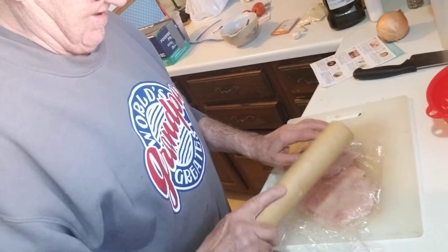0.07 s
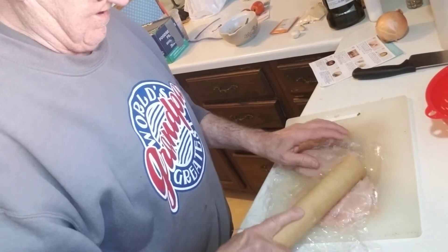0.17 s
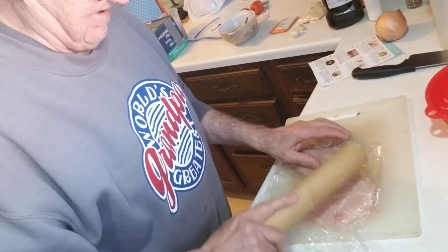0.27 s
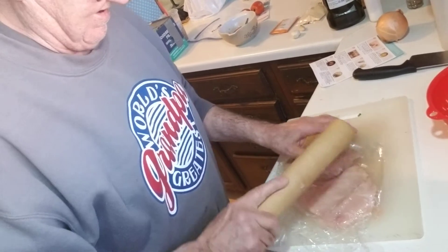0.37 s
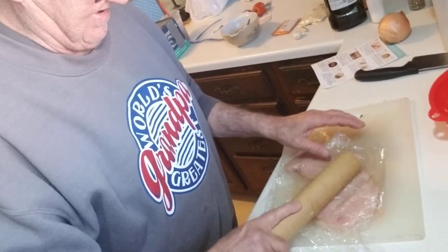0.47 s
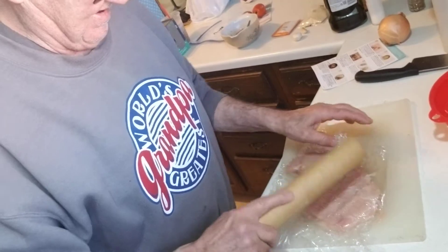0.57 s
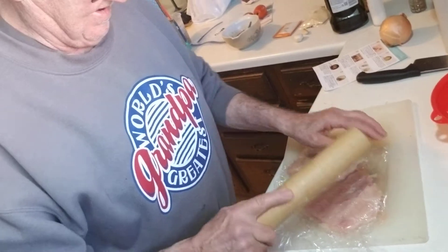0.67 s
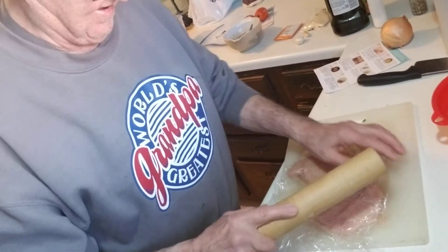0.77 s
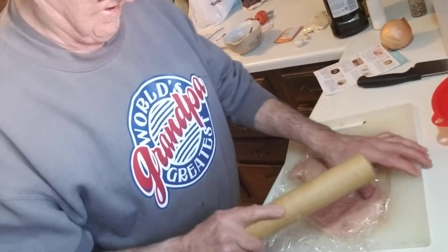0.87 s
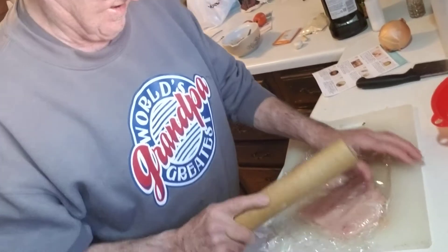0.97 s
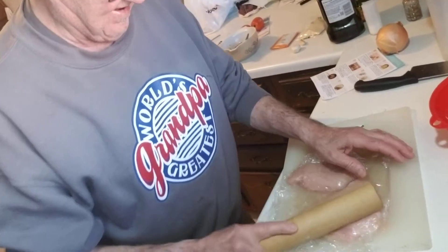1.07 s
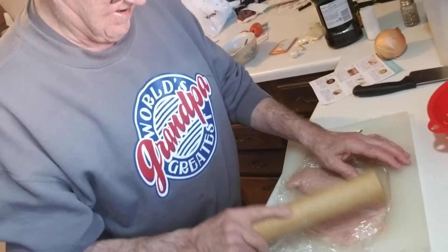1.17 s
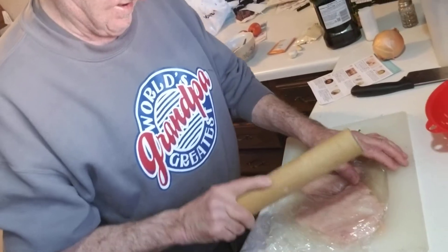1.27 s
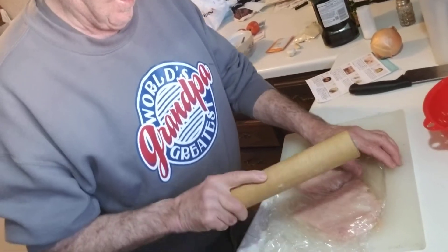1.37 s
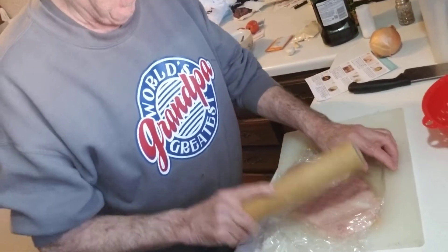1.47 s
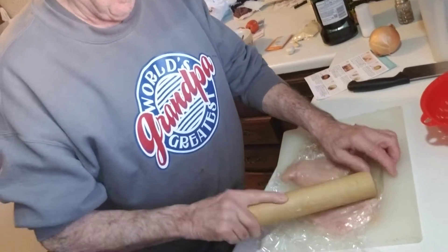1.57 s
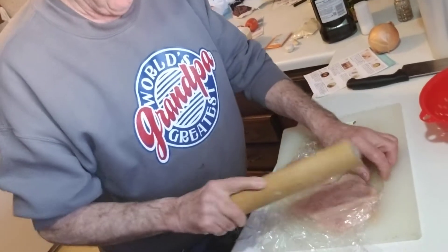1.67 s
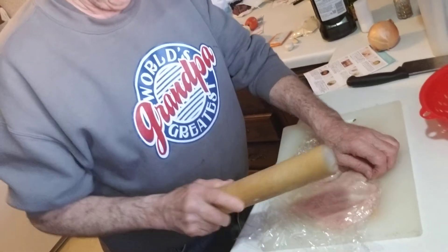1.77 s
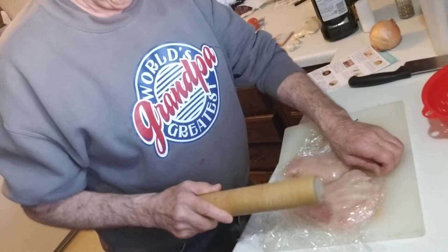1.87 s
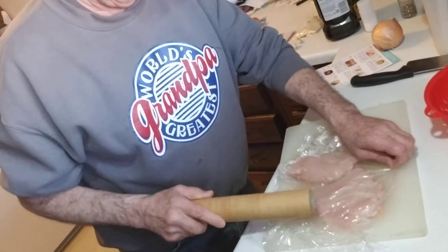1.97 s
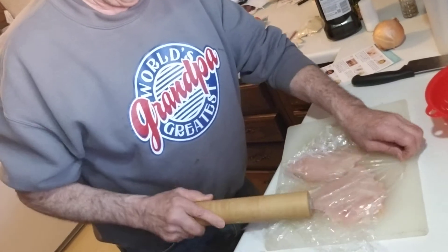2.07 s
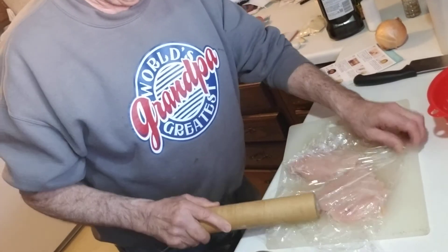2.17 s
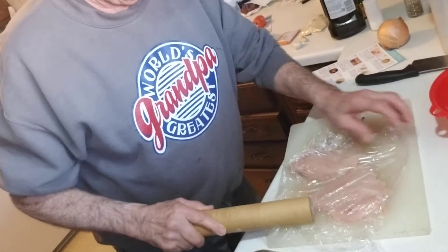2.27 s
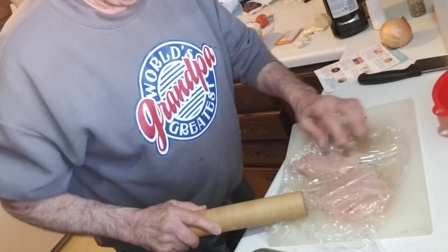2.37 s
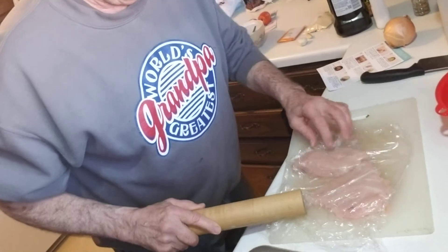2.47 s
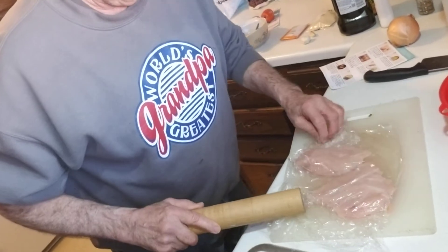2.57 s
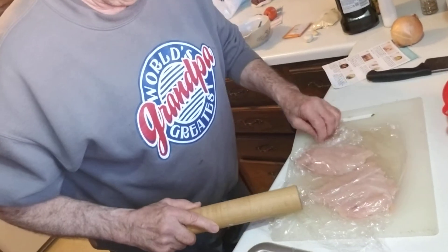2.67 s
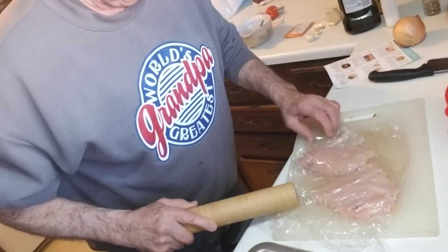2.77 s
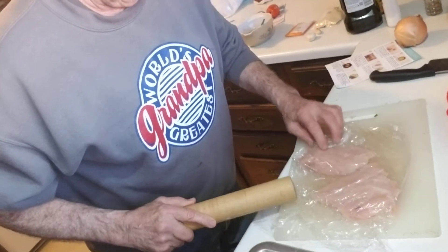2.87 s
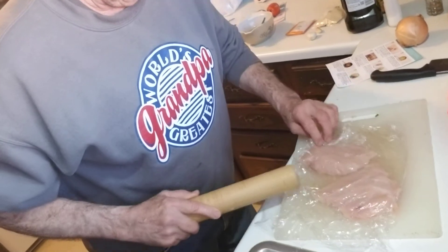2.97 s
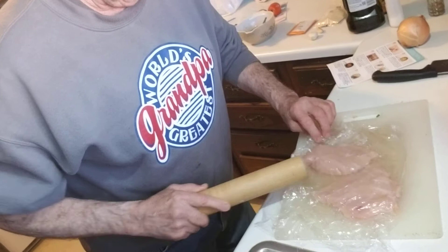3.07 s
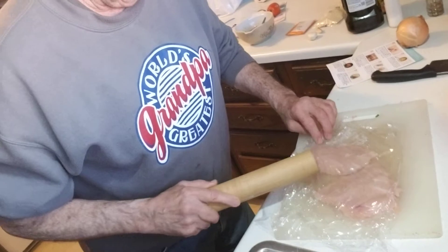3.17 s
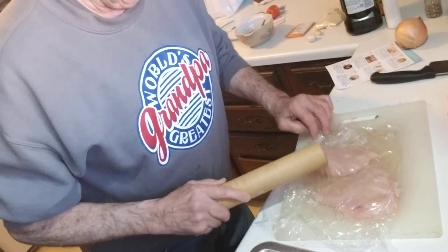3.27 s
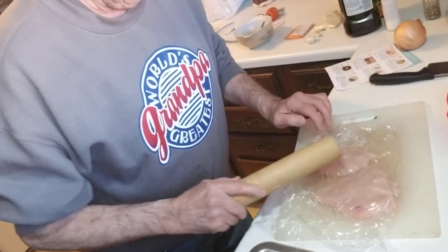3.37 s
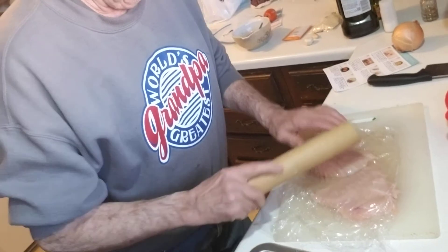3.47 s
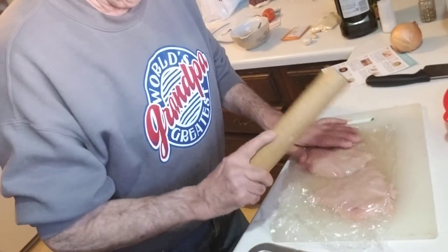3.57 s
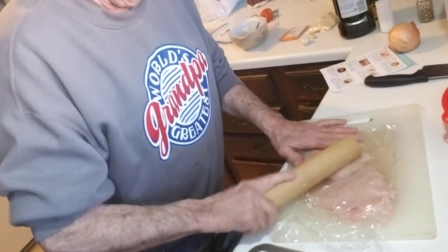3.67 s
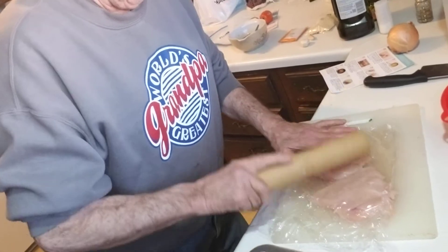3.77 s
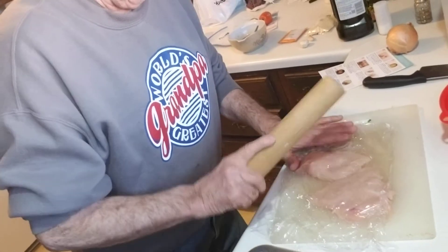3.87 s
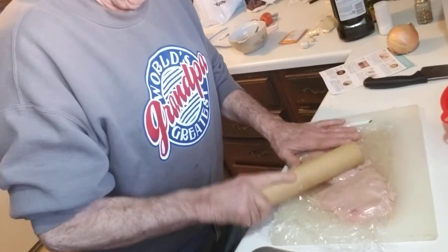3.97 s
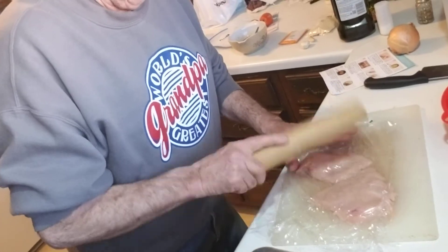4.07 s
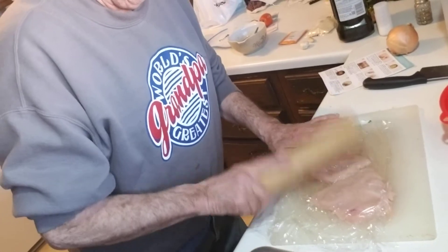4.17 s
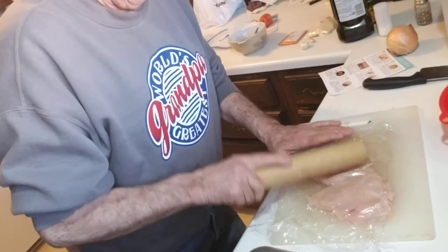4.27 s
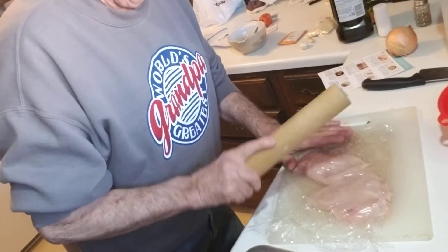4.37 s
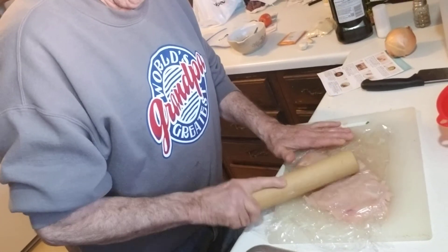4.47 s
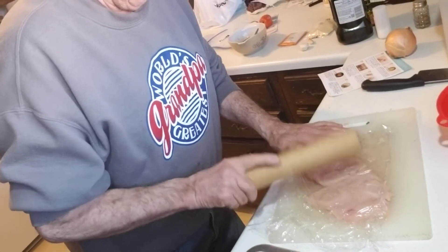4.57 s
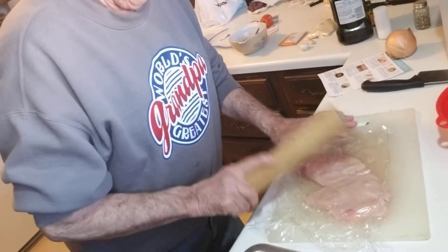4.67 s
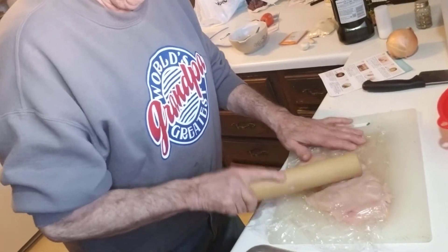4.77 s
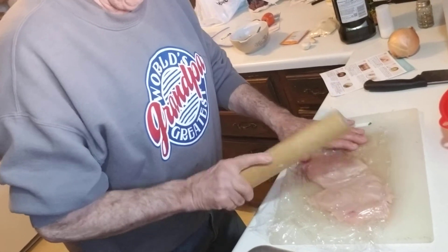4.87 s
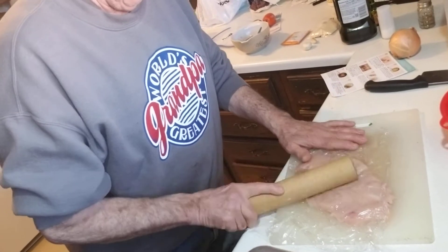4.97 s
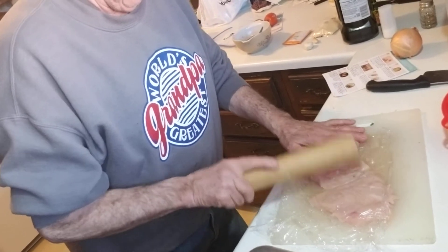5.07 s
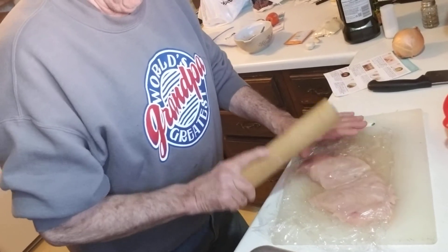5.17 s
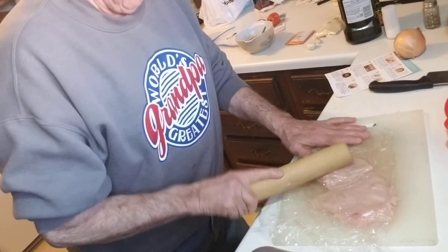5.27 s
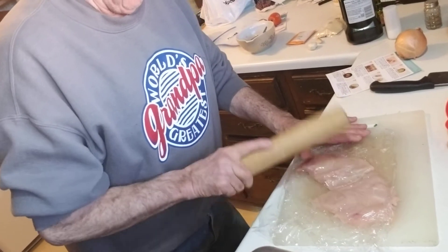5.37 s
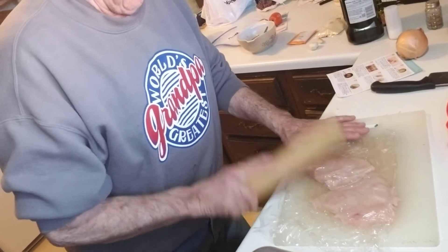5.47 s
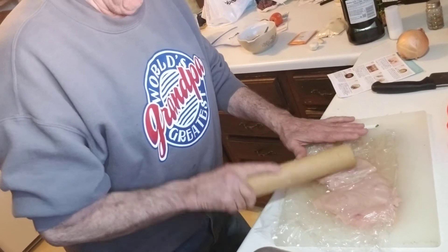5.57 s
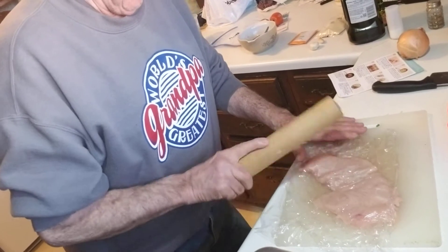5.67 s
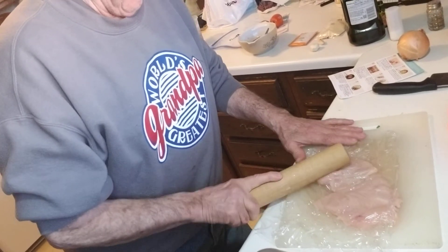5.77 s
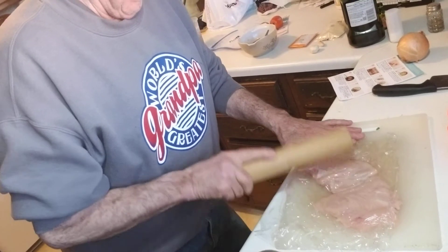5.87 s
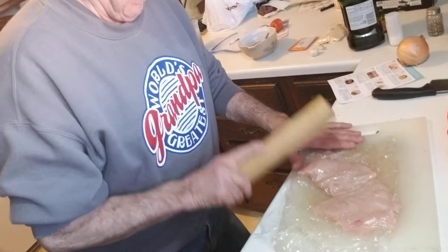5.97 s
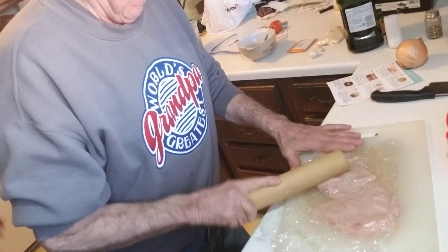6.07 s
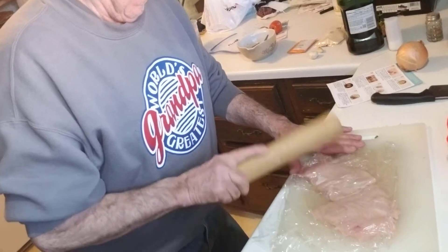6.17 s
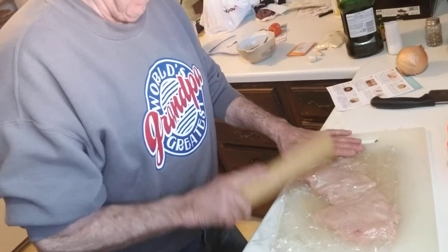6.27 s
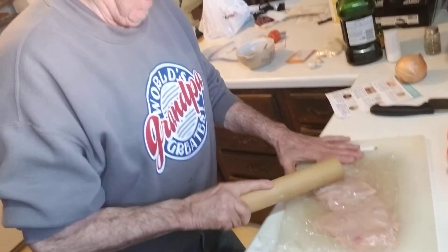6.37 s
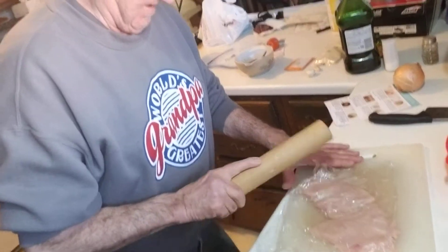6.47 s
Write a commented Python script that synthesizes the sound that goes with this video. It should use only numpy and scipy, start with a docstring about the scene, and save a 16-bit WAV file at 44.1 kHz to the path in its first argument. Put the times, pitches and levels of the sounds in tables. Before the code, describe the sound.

Heavy, cushioned thuds on meat and board, heard by close stereo microphones in a small, quiet kitchen. Each has a crisp plastic snap, a brief wet splat, a hollow counter boom and a small loose rattle. Four uneven blows come first, then film is tugged and crackles over soft rumbling and rubbing. After a near-still moment, pounding resumes regularly, about four per second, growing boomier and flatter toward the end.

```python
"""A kitchen, two microphones close to the counter: a rolling pin pounds chicken under plastic wrap on a board.
Each blow cracks the wrap and splats the meat (showers of tiny clicks) and booms through the counter (ringing modes).
The board rattles after each blow, sooner after a flat one; the wrap peels off the pin on its way up.
Between blows a hand tugs the film into crackle and swish and rubs the board, over soft rumble and room hush."""
import sys
import numpy as np
from scipy import signal
from scipy.fft import rfft, irfft
from scipy.io import wavfile

SR = 44100
rng = np.random.default_rng(int(sys.argv[2]) if len(sys.argv) > 2 else 0)


def wav_record(signal):
    """Record a signal, one row per channel, as 16-bit PCM in the file named by sys.argv[1]."""
    frames = np.transpose(np.atleast_2d(signal))
    bounded = np.clip(frames, -1, 1)
    # unit amplitude maps onto the largest positive 16-bit level
    quanta = np.round(bounded * 32767).astype(np.int16)
    wavfile.write(sys.argv[1], SR, quanta)


N = 287532
TIME = np.arange(N) / SR

# Levels in the tables are source levels, ahead of the balance of direct and room sound.
# The room's quiet background: (frequency [Hz], relative level [dB])
HUSH_SPECTRUM = [(25, -17), (55, -1.5), (115, -3.5), (150, -18), (300, -23.5), (600, -26), (1400, -29.5),
                 (4000, -36.5), (8000, -40), (13000, -30.5), (16000, -35.5)]
# Reverberation of the kitchen: (frequency [Hz], decay by 60 dB [s])
KITCHEN_T60 = [(100, 1), (300, 0.27), (700, 0.31), (1800, .32), (4800, 0.26), (8000, 0.26), (13000, 0.15)]
# Likeness of the sound at the two microphones: (frequency [Hz], correlation [-1 to 1])
LIKENESS = [(100, 0.97), (290, 0.88), (640, 0.31), (1400, -0.18), (3100, 0.013), (7000, -0.039)]
# Body leaning on the counter: (frequency [Hz], relative level [dB])
RUMBLE_SPECTRUM = [(25, -17.5), (42, -13), (54, -3), (72, -3), (95, -5), (115, -9), (145, -20.5),
                   (400, -66)]
# Hand rubbing over the board: (frequency [Hz], relative level [dB])
RUBBING_SPECTRUM = [(100, -17.5), (155, 8.5), (210, -11), (300, -8), (400, -10), (500, -18.5), (900, -21.5),
                    (3000, -62)]
# Rubs of the hand: (time of hardest press [s], swell [s], release [s], level [dB])
RUBS = [(2.125, 0.068, 0.15, -40.5), (2.35, 0.21, 0.09, -48.5), (2.76, 0.29, .1, -55)]
# Tugs at the wrap: (time at the tautest [s], swell [s], release [s], crinkle [dB], swish against crinkle [dB])
TUGS = [ (.01, 0.066, 0.062, -60, -8), (.165, 0.087, .05, -55, -18), (.91, 0.084, 0.055, -58.5, -27),
        (2.02, 0.49, 0.26, -46.5, -8.5), (2.17, 0.09, 0.14, -46, -10.5), (2.32, 0.098, 0.062, -51, -8),
        (2.539, 0.19, 0.25, -43.5, -8), (2.933, 0.14, 0.11, -45, -6.5), (3.201, 0.66, 0.11, -51.5, -8),
        (3.528, 0.024, 0.27, -45, -4.5)]
# Lone snaps of the wrap: (time [s], level [dB])
SNAPS = [(0.108, -49), (1.058, -50.5), (1.396, -53), (1.844, -33.5), (2.171, -37), (3.524, -44)]
# Crinkling film: (frequency [Hz], relative level [dB])
CRINKLE_SPECTRUM = [(1000, -16.5), (4000, -10.5), (7000, -17.5), (10000, -9), (13000, -2.5), (15500, -3)]
# Softer swish of the film: (frequency [Hz], relative level [dB])
SWISH_SPECTRUM = [(400, -31), (900, -8), (1500, -5.5), (2400, 1), (3300, -2), (4600, 0.5), (7000, -16),
                  (15000, -16)]
# Rattling board: (frequency [Hz], relative level [dB])
BOARD_SPECTRUM = [(90, -12.5), (200, -6), (400, 1), (520, -3.5), (660, 1.5), (830, -7.5), (1000, -9),
                  (2300, -15.5), (3400, -20), (5300, -19), (7000, -29.5), (10000, -24), (13000, -19.5),
                  (16000, -25.5)]
# A utensil set ringing by the board's clatter: (frequency [Hz], level [dB], decay by 60 dB [s])
UTENSIL_MODES = [(1470, -74, .8), (1410, -70, .8)]
# Crack of the wrap under the pin: (frequency [Hz], relative level [dB])
CRACK_SPECTRUM = [(500, -22), (2000, -10), (4800, -15.5), (7000, -20.5), (10000, -12.5), (13000, -1),
                  (15500, -9)]
# Wet splat of the meat: (frequency [Hz], relative level [dB])
SPLAT_SPECTRUM = [(120, -16), (300, 12), (520, 4), (700, 6.5), (1000, 1.5), (2100, 0.5), (3300, -6),
                  (4900, -4.5), (7000, -15), (10000, -9), (13000, -12.5), (16000, 1.5)]
# Counter and the cabinet below it: (frequency [Hz], level [dB], decay by 60 dB [s])
COUNTER_MODES = [(45.6, -34.5, 0.72), (58.77, -17.5, 0.34), (92.1, -12, 0.18), (129.35, -26.5, 0.52),
                 (145.7, -19.5, 0.41), (156.7, -9.5, .24), (175.4, -17, 0.35), (202.4, -17.5, 0.34),
                 (237.5, -19, 0.32), (266, -11, 0.089), (296.7, -15.5, 0.28), (315, -26.5, 0.51),
                 (323.3, -18.5, 0.19), (404.4, -21.5, 0.31), (453, -32, 0.49)]
# Things on the counter that ring on: (frequency [Hz], level [dB], decay by 60 dB [s])
SYMPATHY_MODES = [(204.6, -45.5, 1.4), (370, -44.5, 0.99)]
# The pin rested on the edge of the board: (time [s], force [dB], time to peak force [ms], board knock [dB])
SET_DOWN = (2.056, -26.5, 0.45, -38)
# Blows of the pin: (time [s], force [dB], time to peak force [ms], wrap crack [dB], wet splat [dB],
# peeling [dB], board knock [dB], flatness [0 to 1])
BLOWS = [ (.173, 2, 1.17, -14, -22, -72, -31, 0.08), (.455, 0.5, 0.98, -19.5, -27.5, -70, -35.5, 0),
         (1.081, 0, 0.69, -15, -28, -78, -31, 0.15), (1.518, 1.2, 0.92, -20.5, -27, -57.5, -32.5, 0),
         (3.679, 3, 1.15, -11, -20, -46.5, -21.5, 0.03), (3.951, 2, 0.82, -16.5, -14.5, -64, -23, 0.05),
         (4.197, -1.2, 0.33, -8.5, -13.5, -58, -27.5, 0.05), (4.45, -1, 0.85, -20, -21.5, -60.5, -26.5, 0),
         (4.715, 0.5, 0.32, -17.5, -19, -69, -25, 0.01), (4.958, -1, 1.03, -19.5, -24, -61.5, -30.5, 0.02),
         (5.22, 3.5, 2.76, -22.5, -32, -60, -23.5, 0.11), (5.495, 2, 1.1, -23.5, -26.5, -63.5, -17.5, 0.83),
         (5.756, 3.5, 1.77, -13, -23, -63, -23, 0.14), (6.019, 7.5, 2.8, -20.5, -27, -78, -19.5, 0.53),
         (6.292, 7, 2.95, -24.5, -31, -57, -21.5, 0.43)]

HUSH_DB = -66
CUTOFF_HZ = 15950
ROOM_SIZE = 16384   # samples in a room response and in a burst
EAR_LAG_S = .00016   # direct sound, right microphone after left
STROKE_RANGE_DB = 24   # gained over a stroke's swell, lost over its release
RUMBLE_DB, STILL_DIP_DB = -59.5, 17   # the body keeps still for a moment
STILL_FROM_S, STILL_TO_S, SETTLE_S = 2.96, 3.4, 0.076
SLAM_S, FALL_BACK_S = .014, .033   # board knocks, after the blow
TOUCH_S = 5.2   # from here on the clatter rings the utensil
LIFT_S = .1   # the wrap starts to unstick, after the blow


def from_db(db):
    """Decibels to amplitude."""
    return 10 ** (np.asarray(db) / 20)


def at_hz(points, hz):
    """Reads a table on a log-frequency axis."""
    points = np.array(points)
    return np.interp(np.log(hz + 1e-3), np.log(points[:, 0]), points[:, 1])


def through(x, response):
    """Convolution, cut to the length of the scene."""
    return signal.oaconvolve(np.atleast_2d(x), np.atleast_2d(response), axes=-1)[:, :N]


def add(track, s, sound):
    """Mixes a sound in from time s on."""
    start = max(round(s * SR), 0)
    track[..., start:start + sound.shape[-1]] += sound[..., :N - start]


def colour(x, spectrum, size=4096):
    """Causal (minimum-phase) filter that keeps the power of white noise."""
    hz = np.arange(size // 2 + 1) * SR / size
    bass_cut = np.hypot(1, spectrum[0][0] / 2 / (hz + 1))
    top_cut = np.hypot(1, (hz / CUTOFF_HZ) ** 20)
    gain = from_db(at_hz(spectrum, hz)) / bass_cut / top_cut
    # folding the cepstrum onto positive times makes the phase minimal
    fold = np.r_[1, np.full(size // 2 - 1, 2)]
    cepstrum = irfft(np.log(gain))[:size // 2] * fold
    response = irfft(np.exp(rfft(cepstrum, size)))
    return through(x, response / np.linalg.norm(response))


def grains(count, spread_db):
    """Dense tiny clicks of uneven size; rms 1."""
    sizes = from_db(spread_db * np.clip(rng.standard_normal(count), -2, 2))
    x = rng.standard_normal(count) * sizes
    return x / np.std(x)


def clumps(count, spread_db, per_s):
    """A gain that makes clicks come in uneven bunches; rms 1."""
    knots = np.arange(0, count + SR / per_s, SR / per_s)
    heights = np.clip(rng.standard_normal(len(knots)), -2, 2)
    gain = from_db(spread_db * np.interp(np.arange(count), knots, heights))
    return gain / np.sqrt(np.mean(gain ** 2))


def bursts(times, levels_db, rise_s, t60, spread_db, clump_db=0):
    """A swelling and dying shower of clicks at each time, with no pitch of its own."""
    track, t = np.zeros(N), TIME[:ROOM_SIZE]
    shape = (1 - np.exp(-t / rise_s)) * from_db(-60 * t / t60)
    shape /= shape.max()
    for s, level_db in zip(times, levels_db):
        envelope = shape * clumps(len(t), clump_db, per_s=500)
        shower = grains(len(t), spread_db) * envelope
        for _ in range(2):
            flat = irfft(np.exp(1j * np.angle(rfft(shower))))   # all frequencies equally strong
            shower = flat * envelope ** .25   # holds the flattened shower in its envelope
        shower *= np.linalg.norm(shape) / np.linalg.norm(shower)
        add(track, s, from_db(level_db) * shower)
    return track


def stroke(peak_s, swell_s, release_s):
    """Gain of one stroke of the hand: it builds up to a peak and lets go."""
    away = np.maximum((peak_s - TIME) / swell_s, (TIME - peak_s) / release_s)
    return from_db(-STROKE_RANGE_DB * np.minimum(away, 10))


def ringing(modes, lag_s):
    """Stereo response of struck modes, alternating in sign; sides take turns, in pairs of modes, to hear first."""
    t, out = TIME[:SR], 0
    for k, (hz, level_db, t60) in enumerate(modes):
        side = (-1) ** (k // 2) * np.array([[1], [-1]])
        age = np.maximum(t + lag_s / 2 * side - lag_s / 2, 0)
        decay = from_db(level_db - 60 * age / t60)
        out = out + (-1) ** k * decay * np.sin(2 * np.pi * hz * age)
    return out


def diffuse(count):
    """White noise at two microphones, as alike at each frequency as the likeness table says."""
    mid, side = rfft(rng.standard_normal((2, count)))
    alike = np.clip(at_hz(LIKENESS, np.arange(len(mid)) * SR / count), -1, 1)
    shared = np.sqrt((1 + alike) / 2) * mid
    opposed = np.sqrt((1 - alike) / 2) * side * [[1], [-1]]
    return irfft(shared + opposed, count)


def kitchen(build_up_s=0.00055):
    """One pattern of echoes from counter, cupboards and walls; each octave dies at its own rate."""
    field, t = rfft(diffuse(ROOM_SIZE)), TIME[:ROOM_SIZE]
    hz = np.arange(field.shape[1]) * SR / ROOM_SIZE
    octave = np.log2(np.clip(hz, 125, 16000) / 125)
    tail = 0
    for k in range(int(octave[-1]) + 1):
        band = irfft(field * np.maximum(1 - abs(octave - k), 0))
        tail = tail + band * from_db(-60 * t / at_hz(KITCHEN_T60, 125 * 2 ** k))
    tail = tail * (1 - np.exp(-(t / build_up_s) ** 2))
    return tail / np.sqrt(np.sum(tail ** 2) / 2)


def heard(x, room, direct_db, room_db, pan_db, steady_share=.14):
    """Direct sound reaches the left microphone first; the echoes shift as each blow lands on a new spot."""
    right = np.interp(TIME - EAR_LAG_S, TIME, x[0], left=0)
    out = from_db(direct_db) * np.array([x[0], right])
    edges = [0] + [round(row[0] * SR) for row in BLOWS] + [N]
    for start, end, shifting in zip(edges, edges[1:], rng.permutation(room[1:])):
        echoes = np.sqrt(steady_share) * room[0] + np.sqrt(1 - steady_share) * shifting
        add(out, start / SR, from_db(room_db) * through(x[:, start:end], echoes))
    return out * from_db([[pan_db / 2], [-pan_db / 2]])


def hush():
    """The quiet kitchen: steady noise, strongest in the bass, around both microphones."""
    return from_db(HUSH_DB) * colour(diffuse(N), HUSH_SPECTRUM)


def handling():
    """Hand and body move against the counter: dull rubs, and a deep rumble that sinks while the body is still."""
    pressure = sum(from_db(level_db) * stroke(s, swell_s, release_s)
                   for s, swell_s, release_s, level_db in RUBS)
    still = np.clip(1 + np.minimum(TIME - STILL_FROM_S, STILL_TO_S - TIME) / SETTLE_S, 0, 1)
    rumble = from_db(RUMBLE_DB - STILL_DIP_DB * still) * colour(diffuse(N), RUMBLE_SPECTRUM)
    return rumble + pressure * colour(diffuse(N), RUBBING_SPECTRUM)


def wrap(room, clump_db):
    """Each tug makes the film crackle in clumps of tiny buckles over a softer swish; lone snaps stand out."""
    bunches = clumps(N, clump_db, per_s=600)
    pulls = np.array([from_db(level_db) * stroke(s, swell_s, release_s)
                      for s, swell_s, release_s, level_db, _ in TUGS])
    swishes = pulls * from_db([row[-1:] for row in TUGS])
    # overlapping tugs add in power
    crinkle = np.linalg.norm(pulls, axis=0) * bunches * grains(N, spread_db=13.5)
    swish = np.linalg.norm(swishes, axis=0) * bunches * grains(N, spread_db=10.0)
    snaps = bursts(*np.transpose(SNAPS), rise_s=0.00023, t60=0.0056, spread_db=0.5)
    film = colour(crinkle + snaps, CRINKLE_SPECTRUM) + colour(swish, SWISH_SPECTRUM)
    return heard(film, room, direct_db=-3.5, room_db=-2.0, pan_db=-1.0)


def knocks():
    """A flat blow slams the board as the meat gives way; others let it spring up and fall back: (s, level dB)."""
    rows = [(SET_DOWN[0], SET_DOWN[-1])]
    for s, *_, knock_db, flatness in BLOWS:
        slam_share = np.clip(flatness, 0, .99)   # share of the knock's power
        for delay_s, share in ((SLAM_S, slam_share), (FALL_BACK_S, 1 - slam_share)):
            rows.append((s + delay_s, knock_db + 10 * np.log10(share + 1e-9)))
    return rows


def board(room):
    """The board knocks on the counter in a short, uneven rattle, which later also rings a utensil."""
    s, level_db = np.transpose(knocks())
    clatter = bursts(s, level_db, rise_s=0.0011, t60=0.05, spread_db=9, clump_db=4.0)
    rattle = colour(clatter, BOARD_SPECTRUM)
    utensil = through(rattle * (TIME > TOUCH_S), ringing(UTENSIL_MODES, lag_s=0)[0])
    return heard(rattle + utensil, room, direct_db=-2.5, room_db=2.5, pan_db=-0.9)


def slaps(room):
    """Trapped air cracks the wrap, the meat splats, the wrap buckles, then unsticks as the pin lifts."""
    s, _, _, crack_db, splat_db, peel_db, _, _ = np.transpose(BLOWS)
    crack = bursts(s, crack_db, rise_s=0.0004, t60=0.009, spread_db=4.0)
    splat = bursts(s, splat_db, rise_s=0.0007, t60=0.055, spread_db=3.0, clump_db=4.5)
    buckle_db = .5 * crack_db - 36.5   # follows the crack at half its range
    buckle = bursts(s + 0.017, buckle_db, rise_s=0.012, t60=0.088, spread_db=14.0, clump_db=7.5)
    peel = bursts(s + LIFT_S, peel_db, rise_s=.035, t60=0.53, spread_db=8.0, clump_db=4.5)
    film = colour(crack, CRACK_SPECTRUM) + colour(buckle + peel, CRINKLE_SPECTRUM)
    meat = colour(splat, SPLAT_SPECTRUM)
    return (heard(film, room, direct_db=-5.0, room_db=-1.0, pan_db=-3.0)
            + heard(meat, room, direct_db=-8.0, room_db=3.0, pan_db=0.05))


def thuds(knock_db, knock_ms):
    """The meat cushions each blow into a smooth push on the counter: the longer the contact, the deeper the boom."""
    force, t = np.zeros(N), TIME[:SR // 20]
    pushes = [row[:3] for row in BLOWS + [SET_DOWN]]
    pushes += [(s, level_db + knock_db, knock_ms) for s, level_db in knocks()]
    for s, force_db, peak_ms in pushes:
        push = t ** 2 * np.exp(-2000 * t / peak_ms)   # peaks after peak_ms
        add(force, s, from_db(force_db) * push / push.sum())
    modes = ringing(COUNTER_MODES, lag_s=0.00028) + ringing(SYMPATHY_MODES, lag_s=.0002)
    return through(force, modes)


def scene():
    """From the hush of the kitchen up to the blows on the counter."""
    room = np.array([kitchen() for _ in range(len(BLOWS) + 2)])   # one steady echo pattern, then the shifting ones
    background = hush() + handling()
    boom = thuds(knock_db=2.5, knock_ms=0.45) * from_db([[.5], [-.5]])
    reflections = through(boom.mean(axis=0), room[0]) * [[1], [-1]]
    boom = boom + from_db(-40.5) * reflections   # these widen the boom
    return background + wrap(room, clump_db=4.5) + board(room) + slaps(room) + boom


def record(dry):
    """A steep low-pass filter cuts the top of both microphone signals."""
    return signal.sosfilt(signal.ellip(10, .2, 70, CUTOFF_HZ, fs=SR, output="sos"), dry)


dry = scene()
out = record(dry)
wav_record(out)
```